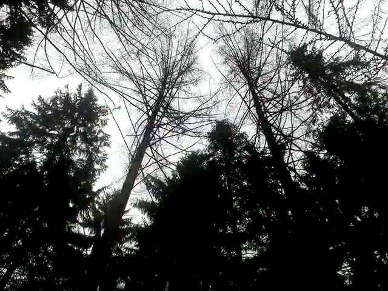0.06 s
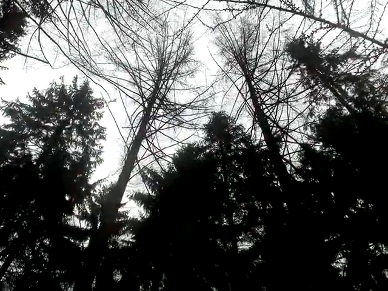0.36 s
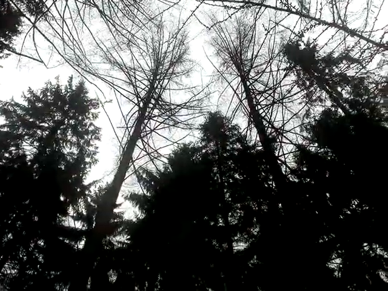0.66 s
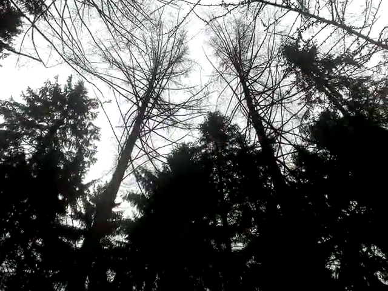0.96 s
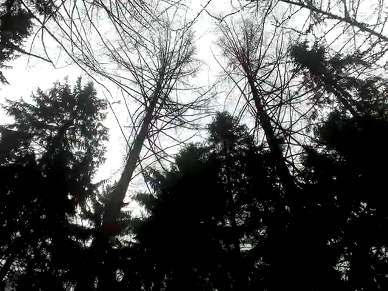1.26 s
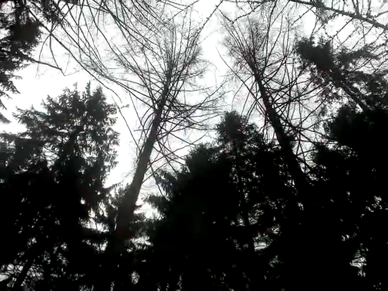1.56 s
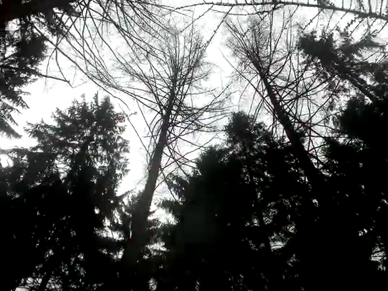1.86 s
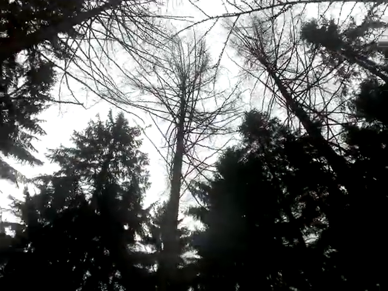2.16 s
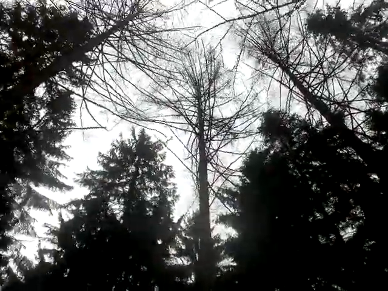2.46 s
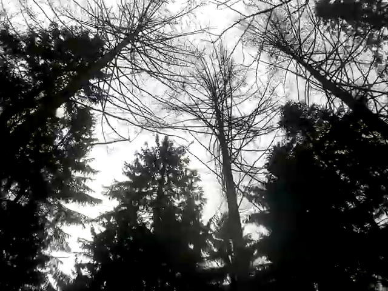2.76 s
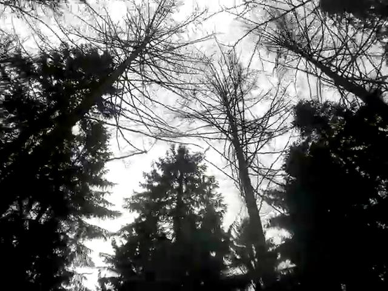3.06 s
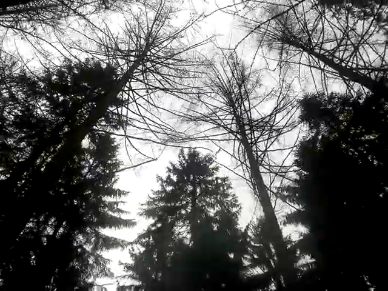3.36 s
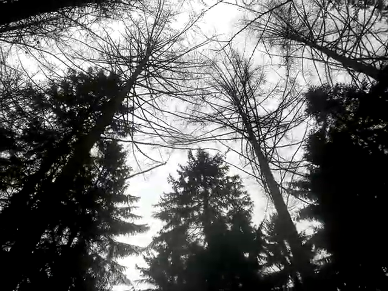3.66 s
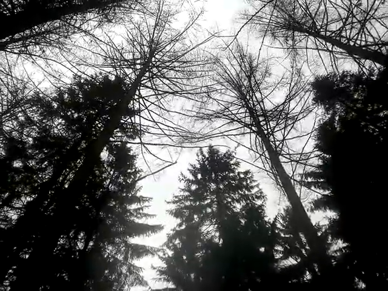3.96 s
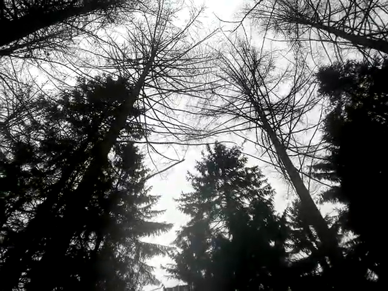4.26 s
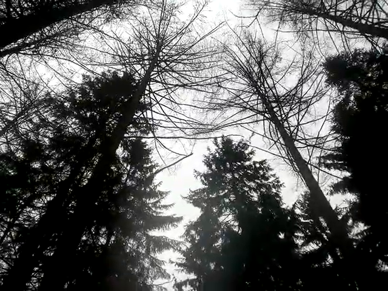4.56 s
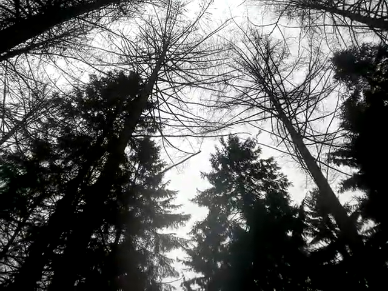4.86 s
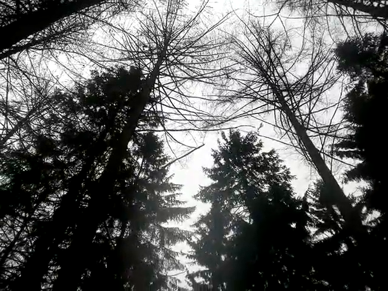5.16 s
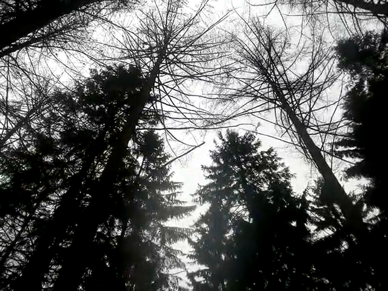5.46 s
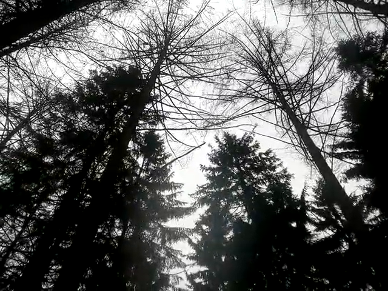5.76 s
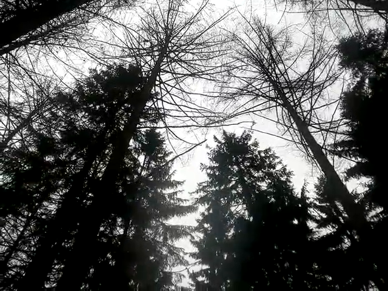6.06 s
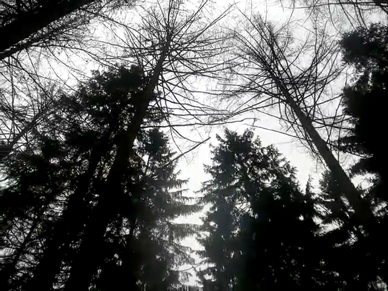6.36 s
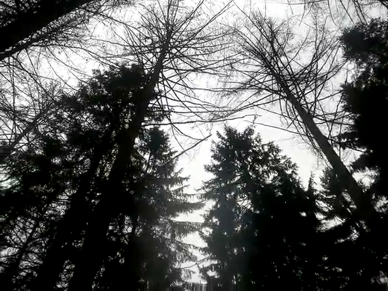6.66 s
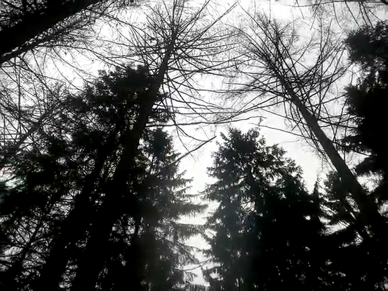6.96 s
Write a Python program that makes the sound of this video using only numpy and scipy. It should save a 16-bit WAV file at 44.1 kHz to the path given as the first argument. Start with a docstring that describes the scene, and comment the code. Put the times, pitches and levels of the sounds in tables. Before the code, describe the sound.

Gusts of wind buffet the microphone with low rumbles and thumps over a steady rush of treetops, with one small twig snap.

```python
"""On the forest floor, under tall spruces and bare larches, a gust buffets the two microphone ports of a
hand-held camera. Turbulent pressure rumbles in each port on its own, with puffs on one side or the other
and a few hard thumps from single eddies. One twig snaps and tiny dry ticks sound close by. Overhead,
vortex shedding makes the crowns roar and their needles hiss, while the camera turns slowly beneath them."""
import sys
import numpy as np
from scipy import signal
from scipy.fft import rfft, irfft
from scipy.io import wavfile
from scipy.ndimage import uniform_filter1d, map_coordinates

SR = 44100
rng = np.random.default_rng(int(sys.argv[2]) if len(sys.argv) > 2 else 0)


def generate_wav(sig):
    """Save sig (samples, or channels by samples) to the path in sys.argv[1] as 16-bit PCM at SR."""
    pcm = np.round(np.clip(np.atleast_2d(sig).T, -1, 1) * 32767).astype(np.int16)
    wavfile.write(sys.argv[1], SR, pcm)


N = 309582
TIME = np.arange(N) / SR
FREQS = np.fft.rfftfreq(N, 1 / SR)


# The gust at the ground. Each row: time in seconds, turbulence level in dB, left minus right in dB.
GROUND_GUST = [(0, -50, -0.5), (0.42, -49, 10), (0.52, -58, 2), (0.86, -42.5, 6.5), (1.14, -51, -3),
               (1.5, -41.5, 2.5), (1.63, -42.5, -7), (1.78, -30, 1), (1.97, -41, 8.5), (2.15, -19.5, -3.5),
               (2.5, -39, 19), (2.86, -34, 6), (3.13, -37, 15), (3.5, -30.5, -5.5), (3.63, -44, -6.5),
               (3.92, -50.5, 5), (4.32, -41, -12.5), (4.6, -45.5, -15.5), (5.17, -56.5, -2),
               (7.02, -71.5, 11)]
# Puffs in the gust. Each row: start in seconds, length in seconds, level in dB, port (0 left, 1 right).
PORT_PUFFS = [(0.709, 0.05, -35, 0), (0.909, 0.027, -29, 0), (1.049, 0.073, -38.5, 0),
              (1.279, 0.12, -33, 1), (1.676, 0.16, -29, 0), (2.198, 0.124, -25, 1), (2.3, 0.026, -20, 0),
              (2.43, 0.07, -35, 1), (2.561, 0.036, -24.5, 0), (2.678, 0.081, -33.5, 1),
              (2.738, 0.15, -25.5, 0), (2.905, 0.026, -22.5, 1), (3.027, 0.039, -27.5, 1),
              (3.15, 0.02, -30, 1), (3.235, 0.03, -25.5, 0), (3.295, 0.092, -24.5, 1),
              (3.34, 0.072, -24, 0), (3.751, 0.057, -33.5, 1), (4.18, 0.06, -38, 1), (4.301, 0.017, -32, 1),
              (4.348, 0.047, -34.5, 0), (4.363, 0.022, -40, 1), (4.764, 0.11, -41.5, 1)]

def turbulence(attack_s=0.014, release_s=0.013):
    """Incoherent sources add in power: gust and puffs sum to one level in dB at each port."""
    gust_db, lean_db = curves(GROUND_GUST)
    power = undb(gust_db + np.array([lean_db, -lean_db]) / 2) ** 2
    for onset, length, db, port in PORT_PUFFS:
        rise = (TIME - onset) / attack_s
        fall = 1 - (TIME - onset - length) / release_s
        power[port] += (undb(db) * np.clip(np.minimum(rise, fall), 0, 1)) ** 2
    return 10 * np.log10(power)


# Pressure spectrum of a moderate gust. Each row: frequency in Hz, relative level in dB.
BUFFET_SPECTRUM = [(15, -22.5), (40, -17), (70, 0.5), (110, 1.5), (195, -2), (300, -11), (460, -21),
                   (580, -28), (800, -41.5), (1500, -57), (3000, -82)]

def buffeting(level_db, gain_db, bass_db, brighten, churn_db, surge_db):
    """Turbulent pressure rumbles in a port; faster air makes smaller eddies, so louder is brighter."""
    still_db, moderate_db = -50, -24  # turbulence of the softest air and of a moderate gust
    wander_db = churn_db * walk(70) + surge_db * np.tanh(walk(26))
    force_db = np.maximum(level_db, still_db) + wander_db - moderate_db
    bass_shelf = response([(50, bass_db), (130, 0)])
    bands = list(octaves(noise() * response(BUFFET_SPECTRUM) * bass_shelf, count=7))
    # Dividing by the running RMS lets air speed, not chance, set the strength of each puff.
    rms = np.sqrt(uniform_filter1d(sum(band for _, band in bands) ** 2, size=1500))
    tilt_db = brighten * force_db  # per octave above 125 Hz
    rumble = sum(band * undb(tilt_db * np.clip(np.log2(hz / 125), 0, 1.5)) for hz, band in bands)
    return rumble / rms * undb(level_db + wander_db + gain_db)


# Eddies that hit a port. Each row: time in seconds, level in dB, centre frequency in Hz,
# length in cycles, port (0 left, 1 right).
EDDIES = [(0.9891, -22, 397, 1.5, 1), (0.9912, -23, 127, 1.4, 1), (1.3556, -12, 212, 1.24, 1),
          (1.7208, -14.5, 182, 0.9, 0), (1.7428, -14.5, 160, 3.8, 0), (1.8661, -12, 145, 1.06, 1),
          (1.9150, -21.5, 210, 1.8, 0), (2.0833, -9.5, 129, 1.5, 0), (2.107, -6, 265, 1.02, 1),
          (2.1410, -8.5, 130, 1.4, 0), (2.1730, 0, 292, 0.86, 1), (2.185, -14, 520, 1.8, 1),
          (2.1974, -9, 480, 1.2, 1), (2.203, -10.5, 328, 1.7, 1), (2.2233, -9, 150, 1.8, 1),
          (2.258, -14.5, 388, 1.3, 1), (2.3150, -12, 135, 2.2, 1), (2.4010, -18, 330, 0.98, 0),
          (2.7897, -6.5, 207, 0.96, 0), (2.8070, -5.5, 126, 2.2, 0), (2.8690, -14.5, 190, 3, 0),
          (2.8799, -14, 260, 1.1, 0), (2.9149, -21, 188, 1.6, 1), (2.9234, -16.5, 129, 0.8, 1),
          (3.2950, -10.5, 189, 3.8, 1), (3.3082, -13.5, 150, 1.4, 1), (3.3714, -11.5, 240, 1.86, 0),
          (3.4060, -14.5, 200, 1.3, 0), (3.5557, -18, 204, 2.8, 1), (4.8211, -23.5, 169, 1.6, 1),
          (4.8724, -23, 135, 1.9, 1)]

def thumps(gain_db, crack_db, crack_hz=680, crack_decay_s=0.0029):
    """A passing eddy swings the pressure from push to suction; hard ones crack at the rim of the port."""
    out = np.zeros((2, N))
    rim = signal.butter(3, [crack_hz / 2, crack_hz * 1.29], "band", fs=SR, output="sos")
    for centre_s, db, hz, cycles, port in EDDIES:
        near = abs(TIME - centre_s) < .04
        age = TIME[near] - centre_s
        spread = 3 * cycles ** 2
        swing = -np.imag((1 - 2j * np.pi * hz * age / spread) ** -(spread + 1))  # a short wave packet
        since_push = age + 1 / (4 * hz)  # the push leads the centre by a quarter cycle
        burst = rng.standard_normal(len(age)) * np.exp(-abs(since_push) / crack_decay_s)
        crack = undb(crack_db + db / 2) * unit_peak(signal.sosfilt(rim, burst))
        out[port, near] += undb(db + gain_db) * (unit_peak(swing) + crack)
    return out


# Modes of a dry twig. Each row: frequency in Hz, relative level in dB, decay time in milliseconds.
TWIG_MODES = [(3130, -6, 0.2), (5840, -1.5, 0.18), (7200, -7, 0.17), (11800, -17, .2), (14000, -21, .15)]

def snap(at_s=5.7886, level_db=-12.5, pan_db=23):
    """Brittle fracture excites the heavily damped modes of a twig close by on the left."""
    out = np.zeros((2, N))
    age = TIME[:256] - TIME[128]
    ring = sum(undb(db) * np.cos(2 * np.pi * hz * age) / np.cosh(age * 1000 / decay_ms)
               for hz, db, decay_ms in TWIG_MODES)
    start = int((at_s + age[0]) * SR)
    out[:, start:start + len(age)] = np.outer(undb([level_db, level_db - pan_db]), unit_peak(ring))
    return out


def knock(at_s=5.79, level_db=-34.5, hz=131, decay_s=0.017):
    """The snap jolts the camera body: a damped oscillation puts a soft, low knock on the left under the snap."""
    age = np.maximum(TIME - at_s, 0)
    ring = np.sin(2 * np.pi * hz * age) * np.exp(-age / decay_s)
    return np.outer([undb(level_db), 0], ring)


# Dry ticks. Each row: time in seconds, level in dB, ring frequency in Hz, decay time in milliseconds,
# left minus right in dB.
DRY_TICKS = [(0.3644, -32, 10500, 0.26, -16), (2.171, -28.5, 12000, 0.63, -15),
             (3.798, -28, 13900, .3, -12), (4.438, -33, 13900, .3, -12), (4.5018, -19.5, 12600, 0.067, -20),
             (4.7246, -30, 7600, 0.081, 11), (5.0952, -27, 14800, 0.41, -20),
             (5.1077, -27.5, 14700, .45, -20), (5.613, -39, 6000, .3, 9), (6.629, -30, 5700, 0.27, 19),
             (6.8107, -29.5, 14000, 0.25, -13)]

def ticks(gain_db, grit, low_share, top_hz=15700):
    """A brief impact has a wide spectrum: each tiny contact mixes a short ring with a thin crack."""
    out = np.zeros((2, N))
    age = TIME[:256] - TIME[128]
    for at_s, db, hz, decay_ms, pan_db in DRY_TICKS:
        passband = signal.butter(4, [low_share * hz, top_hz], "band", fs=SR, output="sos")
        envelope = np.exp(-abs(age) * 1000 / decay_ms)
        gritty_ring = np.cos(2 * np.pi * hz * age) + grit * rng.standard_normal(len(age))
        tick = signal.sosfilt(passband, gritty_ring * envelope)
        sides = undb(np.minimum([pan_db, -pan_db], 0) + db + gain_db)
        start = int((at_s + age[0]) * SR)
        out[:, start:start + len(age)] += np.outer(sides, unit_peak(tick))
    return out


# Wind in the crowns. Each row: time in seconds, roar in dB, hiss in dB (both used about their means),
# boost or cut of the twig band in dB.
CROWN_WIND = [(0, -53.5, -53, 2), (0.7, -54.5, -54.5, 2), (1.9, -54.5, -53.5, -2.5), (2.6, -54.5, -54, 2),
              (3.4, -54, -55, 1.8), (4.8, -54, -56, -2.5), (6, -55, -57.5, -0.5), (6.5, -55, -57.5, 2),
              (7.02, -54.5, -58, 3.5)]
# Spectra of the branches and of the needles. Each row: frequency in Hz, spectral level in dB.
ROAR_SPECTRUM = [(20, -103), (60, -84.5), (130, -80.5), (220, -80), (320, -77), (520, -79.5), (950, -80.5),
                 (1500, -83.5), (2400, -89), (4000, -100), (8000, -116)]
HISS_SPECTRUM = [(500, -112), (1500, -92.5), (2500, -91), (4000, -91.5), (6000, -91.5), (9000, -99.5),
                 (16000, -96)]

def treetops(twig_hz=2300, twig_q=1.4, hiss_pan_db=2):
    """Vortex shedding is higher in pitch on thinner bodies: branches roar, twigs sing, needles hiss."""
    roar_db, hiss_db, twig_db = curves(CROWN_WIND)
    roar = canopy(ROAR_SPECTRUM, direct_share=0.44, sway_db=.5, flutter_db=.5)
    hiss = canopy(HISS_SPECTRUM, direct_share=0.17, sway_db=1.06, flutter_db=0.28)
    twig_band = signal.lfilter(*signal.iirpeak(twig_hz, twig_q, fs=SR), hiss)
    hiss += twig_band * (undb(twig_db) - 1)
    lean_db = np.array([[hiss_pan_db], [-hiss_pan_db]]) / 2
    return roar * undb(roar_db - roar_db.mean()) + hiss * undb(hiss_db - hiss_db.mean() + lean_db)


# The windiest crown lies to the left, more so as the camera turns.
# Each row: time in seconds, lead at the left port in milliseconds.
CROWN_LEAD = [(0, 0.27), (1.2, 0.31), (3.5, 0.35), (7.02, 0.41)]

def canopy(spectrum, direct_share, sway_db, flutter_db, port_spacing_ms=0.46):
    """A diffuse field is alike at both ports only for long waves; one crown's direct sound adds a lag."""
    coherence = np.sinc(2 * FREQS * port_spacing_ms / 1000)
    mid = noise() * np.sqrt((1 + coherence) / 2)
    side = noise() * np.sqrt((1 - coherence) / 2)
    diffuse = np.array([mid + side, mid - side])
    crown = rng.standard_normal(N) * np.sqrt(SR / 2)
    lag = curves(CROWN_LEAD)[0] * SR / 1000
    delayed = map_coordinates(crown, [np.arange(N) - lag], order=3, mode="mirror")
    direct = rfft(np.array([crown, delayed]))
    field = np.sqrt(1 - direct_share) * diffuse + np.sqrt(direct_share) * direct
    # Boughs sway slowly and twigs flutter, each size in its own band.
    return sum(band * undb(sway_db * walk(1.52) + flutter_db * walk(13))
               for _, band in octaves(field * response(spectrum), count=10))


def undb(db):
    """Amplitude grows tenfold for every 20 dB."""
    return 10 ** (np.asarray(db) / 20)


def unit_peak(x):
    """Normalisation scales the peak to one."""
    return x / abs(x).max()


def curves(table):
    """Linear interpolation gives each column of a time table one value per sample."""
    times, *columns = np.transpose(table)
    return [np.interp(TIME, times, column) for column in columns]


def response(points):
    """A frequency response joins (Hz, dB) points along a logarithmic frequency axis."""
    hz, db = np.transpose(points)
    return undb(np.interp(np.log(FREQS + 1), np.log(hz), db))


def noise():
    """White noise has a flat spectrum, here with unit power per Hz."""
    return rfft(rng.standard_normal(N)) * np.sqrt(SR / 2)


def octaves(spectrum, count, lowest_hz=31.25):
    """A filter bank splits a spectrum into overlapping octaves, yielding (centre in Hz, sound)."""
    octave = np.clip(np.log2((FREQS + 1) / lowest_hz), 0, count - 1)
    for k in range(count):
        yield lowest_hz * 2 ** k, irfft(spectrum * np.maximum(1 - abs(octave - k), 0), N)


def walk(rate_hz):
    """A spline through random values wanders smoothly, with a spread near one."""
    knots = rng.standard_normal(2048)
    return map_coordinates(knots, [TIME[::64] * rate_hz], order=3, mode="mirror").repeat(64)[:N]


def scene():
    """By superposition, wind at the ports, the crowns and the small close sounds add as pressures."""
    left_db, right_db = turbulence()
    left = buffeting(left_db, gain_db=1.0, bass_db=1.5, brighten=0.46, churn_db=3.0, surge_db=1.64)
    right = buffeting(right_db, gain_db=0, bass_db=-1.5, brighten=0.22, churn_db=2.5, surge_db=1.3)
    wind = np.array([left, right]) + treetops() + thumps(gain_db=-1.5, crack_db=-17)
    return wind + snap() + knock() + ticks(gain_db=2.0, grit=0.84, low_share=0.34)


def gain_control(x, threshold_db, ratio, memory_s):
    """Linked compression: a hard buffet on either port turns both channels down for a moment."""
    pole = np.exp(-1 / (memory_s * SR))
    rms = np.sqrt(signal.lfilter([1 - pole], [1, -pole], np.max(x ** 2, axis=0)))
    return x * np.maximum(rms / undb(threshold_db), 1) ** (1 / ratio - 1)


# The microphone, with a narrow port resonance at the very top. Each row: frequency in Hz, gain in dB.
MICROPHONE_RESPONSE = [(6500, 0), (7300, -5), (8100, -11.5), (11000, -16), (13900, -19.5), (14700, -7),
                       (15500, -9.5)]

def record(dry, top_hz=15700):
    """The microphone's response dulls the treble, compression holds the peaks, a low-pass cuts the top."""
    coloured = irfft(rfft(dry) * response(MICROPHONE_RESPONSE), N)
    held = gain_control(coloured, threshold_db=-19, ratio=2.3, memory_s=0.014)
    return signal.sosfilt(signal.ellip(10, .2, 70, top_hz, fs=SR, output="sos"), held)


dry = scene()
out = record(dry)
generate_wav(out)
```